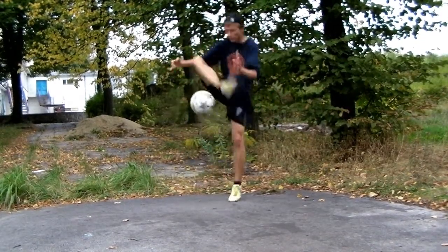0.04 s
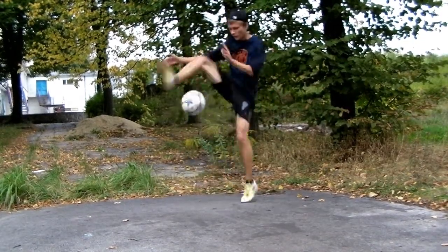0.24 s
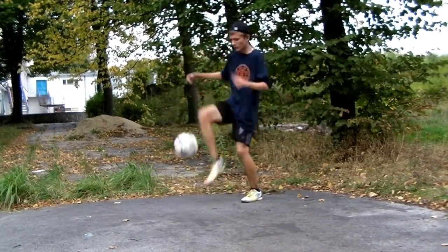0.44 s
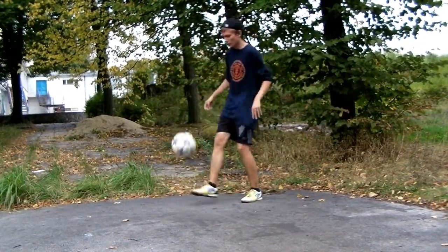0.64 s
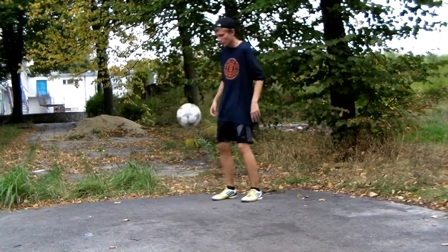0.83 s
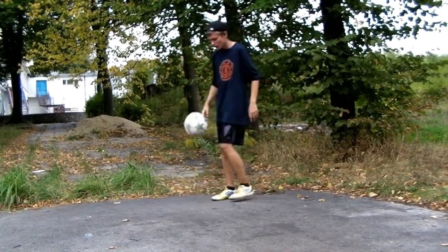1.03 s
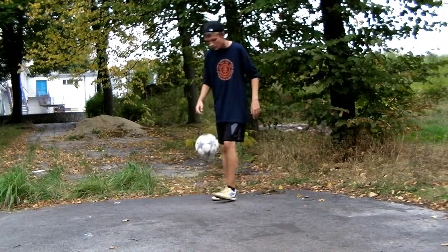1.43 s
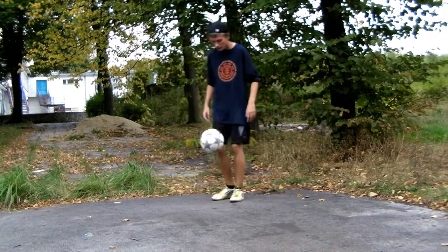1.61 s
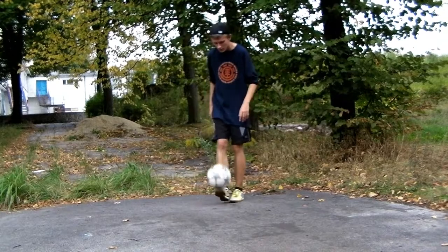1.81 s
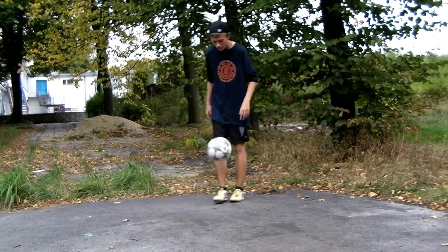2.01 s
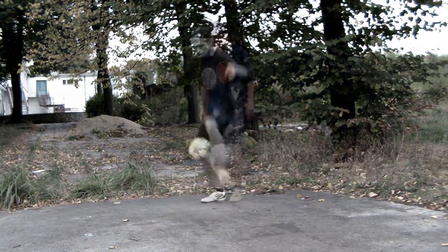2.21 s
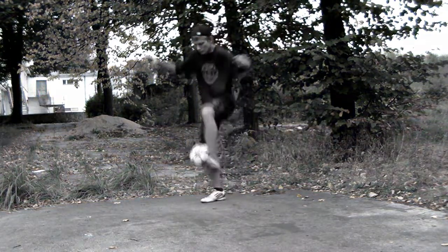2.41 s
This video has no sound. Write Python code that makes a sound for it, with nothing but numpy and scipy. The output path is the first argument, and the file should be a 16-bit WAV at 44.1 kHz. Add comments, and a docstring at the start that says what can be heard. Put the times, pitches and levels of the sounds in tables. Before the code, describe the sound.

A football thumps three times outdoors, hollow with a short slap: a bounce on paving at about 0.7 seconds, a kick at 1.4 and a softer kick at 2.0. Shoes tap and scuff on gritty ground around 0.4, 1.0, 1.7 and 2.2 seconds, the first two dragging softly. A light steady wind runs underneath, and everything fades out by about 2.4 seconds.

```python
"""Football juggling by a wood

A player juggles a football on a paved patch at the edge of a wood, in a light steady wind.
The ball bounces once and is kicked up twice, each hit a slap of skin over a hollow, ringing thump.
Between the touches his shoes land, scuff and drag on gritty paving, and the trees return a faint tail.
The sound is nearly mono, ducks after hard hits and fades out at the end."""
import sys
import numpy as np
from scipy import signal
from scipy.fft import rfft, irfft
from scipy.io import wavfile
from scipy.ndimage import uniform_filter1d

SR = 44100
rng = np.random.default_rng(int(sys.argv[2]) if len(sys.argv) > 2 else 0)


def store_pcm(level_fs):
    """Save levels as 16-bit WAV."""
    pcm = np.round(np.clip(level_fs, -1, 1) * 32767).astype(np.int16)
    wavfile.write(sys.argv[1], SR, np.atleast_2d(pcm).T)


N = 112454

# Wind bed, from low rumble up to leaf hiss: freq_hz, density_db
WIND_SPECTRUM = [(15, -33.5), (25, -11.5), (42, 1.5), (59, 3.5), (80, -1), (114, -1), (160, -10.5),
                 (230, -12.5), (300, -20), (410, -9.5), (600, -15), (900, -14), (1500, -17), (2200, -22),
                 (3000, -27), (5000, -30.5), (7800, -34.5), (9200, -33.5), (10300, -39), (12500, -40)]
# Slow rise and fall of the breeze: time_s, gain_db
BREEZE_CURVE = [(0, 0.5), (.3, -0.06), (.65, 0.5), (.84, 1.5), (1.1, -1.6), (1.35, -0.4), (1.6, 0.5),
                (1.85, -0.5), (2.3, 0.2)]
# Shoe landings and light taps: start_s, level_db, pitch_hz
SHOE_TAPS = [(.4183, -19, 553), (0.517, -21.5, 450), (.731, -16, 420), (0.9443, -21.5, 406),
             (0.962, -24.5, 400), (1.685, -24, 405), (2.2265, -23, 493)]
# Sole scuffs: start_s, hold_s, level_db, tilt_db_per_octave, rasp_hz, rasp_db
SOLE_SCUFFS = [(0.415, 0.02, -38.5, -0.5, 5150, -2), (0.442, .022, -44, -0.5, 5800, 2.5),
               (.506, 0.011, -40.5, -2.5, 5530, -5), (0.945, 0.038, -34.5, -2.5, 2600, 3.5),
               (1.683, 0.02, -35, -1, 3380, 8), (2.221, 0.049, -35, -1.35, 2780, 10)]
# Tone of a scuff on grit: freq_hz, density_db
SCUFF_SPECTRUM = [(200, -12.5), (290, -15), (410, 7.5), (520, -4), (900, -3), (1650, -9.5), (2300, -1),
                  (3500, -5.5), (5300, -1), (7000, -10), (9500, -10.5), (12500, -13)]
# Soles dragging softly after a landing: start_s, length_s, level_db
SOLE_DRAGS = [(0.482, 0.18, -45), (.97, 0.16, -46)]
# Tone of a dragging sole: freq_hz, density_db
DRAG_SPECTRUM = [(300, -19.5), (1100, 4), (2400, 7), (3000, 1), (4100, 6), (5000, -17.5), (12000, -40)]
# Ball hits: start_s, thump_db, thump_hz, shell_db, shell_pitch_ratio, slap_db, slap_rise_s,
# push_db, surface
BALL_HITS = [(.705, -11.5, 374, -14, 1.186, -21, 0.0019, -19, "paving"),
             (1.4204, -8.5, 389.6, -13, 0.96, -25, 0.00042, -25.5, "toe"),
             (1.9941, -14.5, 456, -17.5, 0.86, -28.5, 0.00025, -30.5, "instep")]
# Modes of the ball's shell: pitch_hz, level_db, t60_s
SHELL_MODES = [(406, -12.5, 0.03), (597, -2.5, .03), (740, 1, 0.021), (770, -0.5, 0.0082),
               (1250, -15, 0.021)]
# Ring of the air inside the ball: pitch_hz, level_db, t60_s
CAVITY_MODES = [(1037, -38, 0.27), (1390, -42.5, 0.24), (1750, -34.5, .12), (2200, -35, .2),
                (2550, -39.5, .2)]
# Tone of the slap on paving, toe and instep: freq_hz, density_db
SLAP_SPECTRA = { "paving": [(300, 13), (1300, 10.5), (1900, -4.5), (3100, -9.5), (3600, 2.5), (4500, 0.5),
                (4900, -7), (5200, 2.5), (5450, -6.5), (6000, -2.5), (7300, -0.5), (8500, -12),
                (11800, -2.5)], "toe": [(300, -11.5), (1200, 4), (2400, 5), (3300, -5.5), (4500, 1),
                (6000, -2.5), (7200, 4), (9000, 0.5), (12500, 0.5)], "instep": [(300, 13), (1400, -8),
                (2400, -3), (4000, -9), (5800, 3.5), (7500, -0.5), (9500, -13), (12500, -14)]}
# Decay of the tail from the trees: freq_hz, t60_s
TREE_DECAY = [(100, .2), (500, 0.067), (2000, 0.2), (6000, .22), (12000, 0.065)]
# Stereo width, as side against mid: freq_hz, side_db
STEREO_WIDTH = [(50, -35), (150, -50.5), (500, -23.5), (1200, -24), (2300, -15.5), (4000, -13),
                (7000, -37.5), (9000, -18), (12000, -16)]
# Closing fade: time_s, gain_db
FADE_CURVE = [(2.24, 1.5), (2.291, -1), (2.346, -9.5), (2.37, -23.5), (2.4, -39), (2.45, -73)]

WIND_DB, PATCH_DB, SWELL_DB = -39, 1.0, 0.82
TAP_RISE_S, TAP_T60_S = 0.0028, 0.016
SCUFF_RISE_S, SCUFF_T60_S, RASP_OCTAVES = 0.0056, 0.06, 0.62
GRIT_PER_S, GRIT_SHARE = 3000, 0.4
THUMP_RISE_S, THUMP_T60_S, SHELL_RISE_S = 0.0039, 0.031, 0.0029
PUSH_HZ, PUSH_RISE_S, PUSH_T60_S = 90, 0.0018, 0.12
SLAP_T60_S, SNAP_DB, SNAP_T60_S = 0.02, 1.5, 0.0038
BODY_SEND_DB, SLAP_SEND_DB, SHOE_SEND_DB = -16.5, -6.5, -11.5
LOW_CUT_HZ, HIGH_CUT_HZ = 50, 12650
DUCK_THRESHOLD_DB, DUCK_SLOPE, DUCK_ATTACK_S, HOLD_FALL_DB_PER_S = -34, 0.43, 0.05, 33.5


def amp(db):
    """Decibels to gain."""
    return 10 ** (np.asarray(db) / 20)


def unit(x):
    """Scales to rms 1."""
    return x / np.sqrt(np.mean(x ** 2) + 1e-20)


def curve_at(points, hz):
    """Reads a curve on a log-frequency axis."""
    freqs, values = np.transpose(points)
    return np.interp(np.log(hz + 1), np.log(freqs), values)


def fader(points):
    """Rides the gain along points of time_s, gain_db."""
    return amp(np.interp(np.arange(N) / SR, *np.transpose(points)))


def add(mix, start_s, sound):
    """Drops a sound into the mix."""
    part = mix[round(start_s * SR):][:len(sound)]
    part += sound[:len(part)]


def colour(noise, spectrum, tilt_db=0, rasp_hz=1000, rasp_db=0):
    """EQs noise to a spectrum, with a tilt per octave and one broad bell, at rms 1."""
    hz = np.fft.rfftfreq(len(noise), 1 / SR)
    octaves = np.log2((hz + 1) / rasp_hz)
    bell_db = rasp_db * np.exp(-(octaves / RASP_OCTAVES) ** 2)
    eq_db = curve_at(spectrum, hz) + tilt_db * octaves + bell_db
    return unit(irfft(rfft(noise) * amp(eq_db), len(noise)))


def decay(t, t60):
    """Falls 60 dB in t60 seconds."""
    return np.exp(-np.log(1000) * t / t60)


def ring(t, hz, rise_s, t60):
    """One mode that swells during the contact and dies away."""
    contact = np.sin(np.pi / 2 * np.minimum(t / rise_s, 1)) ** 2
    return -contact * decay(t, t60) * np.sin(2 * np.pi * hz * t)


def wind():
    """A bed of low rumble and leaf hiss, with drifting patches of colour and a slight swell."""
    frames, hz = N // 512 + 5, np.fft.rfftfreq(2048, 1 / SR)
    real, imag, patches = rng.standard_normal((frames, len(hz), 3)).T
    patches = uniform_filter1d(patches, size=20, axis=0)  # smooth across frequency
    patches = unit(uniform_filter1d(patches, size=6, axis=1))  # and through time
    swell = unit(uniform_filter1d(rng.standard_normal(frames), size=16))
    band_db = curve_at(WIND_SPECTRUM, hz)[:, None] + PATCH_DB * patches + SWELL_DB * swell
    bed = signal.istft((real + 1j * imag) * amp(band_db), nperseg=2048, noverlap=1536)[1][:N]
    return amp(WIND_DB) * unit(bed) * fader(BREEZE_CURVE)


def shoes():
    """Rubber soles on paving: dull taps, gritty scuffs and soft drags."""
    feet, t = np.zeros(N), np.arange(SR // 4) / SR
    for start_s, db, hz in SHOE_TAPS:
        add(feet, start_s, amp(db) * ring(t, hz, TAP_RISE_S, TAP_T60_S))
    for start_s, hold_s, db, tilt_db, rasp_hz, rasp_db in SOLE_SCUFFS:
        rub, grain_size = rng.standard_normal((2, len(t)))
        grit = unit(grain_size * (rng.random(len(t)) < GRIT_PER_S / SR))
        friction = GRIT_SHARE * grit + (1 - GRIT_SHARE) * rub
        scuff = colour(friction, SCUFF_SPECTRUM, tilt_db, rasp_hz, rasp_db)
        pressure = np.minimum(t / SCUFF_RISE_S, 1) * decay(np.maximum(t - hold_s, 0), SCUFF_T60_S)
        add(feet, start_s, amp(db) * pressure * scuff)
    for start_s, length_s, db in SOLE_DRAGS:
        pressure = np.sin(np.pi * np.minimum(t / length_s, 1))
        add(feet, start_s, amp(db) * pressure * colour(rng.standard_normal(len(t)), DRAG_SPECTRUM))
    return feet


def ball():
    """Two stems: the body (hollow thump, shell modes, ringing air, low push) and the skin's slap."""
    body, skin, t = np.zeros(N), np.zeros(N), np.arange(SR // 3) / SR
    for start_s, thump_db, thump_hz, shell_db, ratio, slap_db, rise_s, push_db, surface in BALL_HITS:
        thump = amp(thump_db) * ring(t, thump_hz, THUMP_RISE_S, THUMP_T60_S)
        shell = sum(amp(db) * ring(t, hz * ratio, SHELL_RISE_S, t60) for hz, db, t60 in SHELL_MODES)
        air = sum(amp(db) * ring(t, hz, SHELL_RISE_S, t60) for hz, db, t60 in CAVITY_MODES)
        push = amp(push_db) * ring(t, PUSH_HZ, PUSH_RISE_S, PUSH_T60_S)
        add(body, start_s, thump + amp(shell_db) * (shell + air) - push)
        slap = colour(rng.standard_normal(len(t)), SLAP_SPECTRA[surface]) * np.minimum(t / rise_s, 1)
        since_peak = np.maximum(t - rise_s, 0)
        snap = amp(SNAP_DB) * decay(since_peak, SNAP_T60_S)
        add(skin, start_s, amp(slap_db) * slap * (decay(since_peak, SLAP_T60_S) + snap))
    return body, skin


def trees(send):
    """Trunks and leaves scatter a faint tail, each band dying at its own speed."""
    hz, t, bands = signal.stft(rng.standard_normal(SR // 2), SR, nperseg=256)
    tail = signal.istft(bands * decay(t, curve_at(TREE_DECAY, hz)[:, None]), SR, nperseg=256)[1]
    tail[:SR // 200] = 0  # 5 ms pre-delay
    return signal.fftconvolve(send, tail / np.linalg.norm(tail))[:N]


def widen(mid):
    """The narrow image of two close microphones: only a faint diffuse part differs between them."""
    hz, _, bands = signal.stft(mid, SR, nperseg=512)
    diffuse = signal.stft(rng.standard_normal(N), SR, nperseg=512)[2]
    diffuse /= np.sqrt(np.mean(abs(diffuse) ** 2))
    side_bands = abs(bands) * diffuse * amp(curve_at(STEREO_WIDTH, hz))[:, None]
    side = signal.istft(side_bands, SR, nperseg=512)[1][:N]
    return np.array([mid + side, mid - side])


def scene():
    """Ball and shoes dead centre, sent to the trees, over the wind bed."""
    body, skin = ball()
    feet = shoes()
    echo = trees(amp(BODY_SEND_DB) * body + amp(SLAP_SEND_DB) * skin + amp(SHOE_SEND_DB) * feet)
    return widen(wind() + feet + body + skin + echo)


def record(dry):
    """Low cut, gain control that ducks after a hard hit, a closing fade, then a steep high cut."""
    mix = signal.sosfilt(signal.butter(2, LOW_CUT_HZ, "highpass", fs=SR, output="sos"), dry)
    pole = np.exp(-1 / (DUCK_ATTACK_S * SR))
    power = signal.lfilter([1 - pole], [1, -pole], (mix ** 2).mean(0))
    # The detector holds each peak, then lets go at a steady rate.
    fall_db = np.arange(N) / SR * HOLD_FALL_DB_PER_S
    held_db = np.maximum.accumulate(10 * np.log10(power + 1e-12) + fall_db) - fall_db
    excess_db = np.maximum(held_db - DUCK_THRESHOLD_DB, 0)
    duck_db = signal.lfilter([1 - pole], [1, -pole], DUCK_SLOPE * excess_db)
    mix = mix * amp(-duck_db) * fader(FADE_CURVE)
    high_cut = signal.firwin(511, HIGH_CUT_HZ, window=("kaiser", 9), fs=SR)
    return signal.oaconvolve(mix, high_cut[None], "same")


dry = scene()
out = record(dry)
store_pcm(out)
```